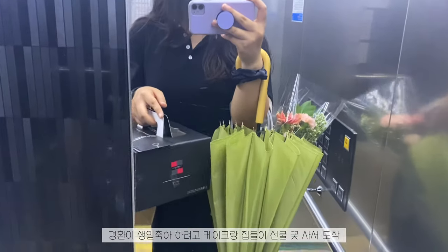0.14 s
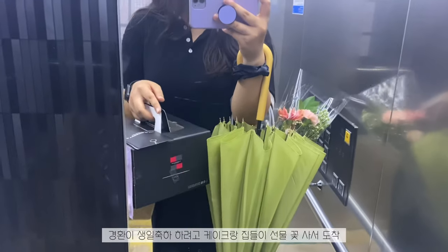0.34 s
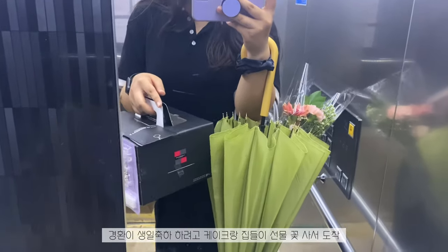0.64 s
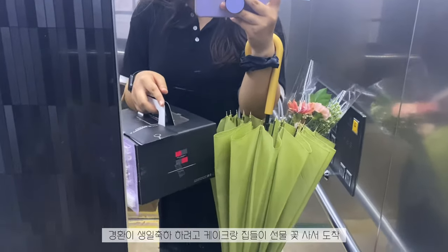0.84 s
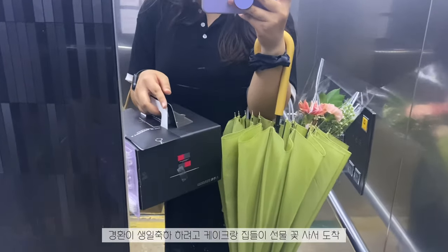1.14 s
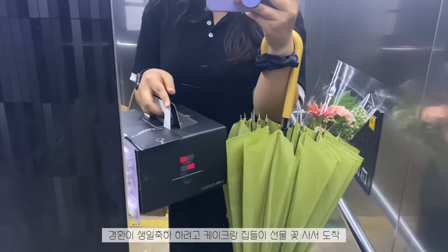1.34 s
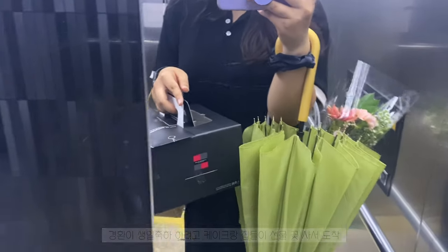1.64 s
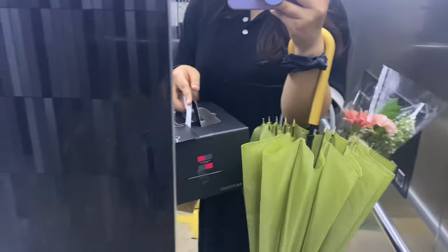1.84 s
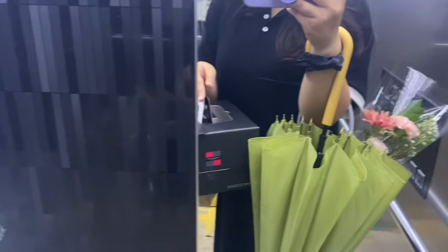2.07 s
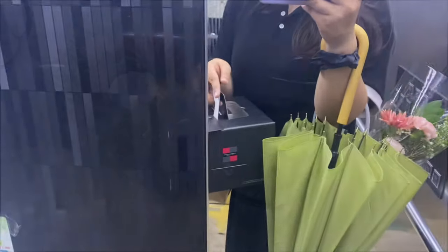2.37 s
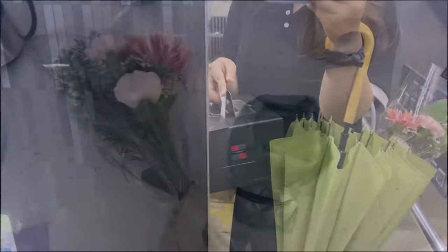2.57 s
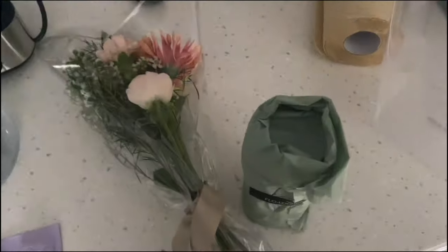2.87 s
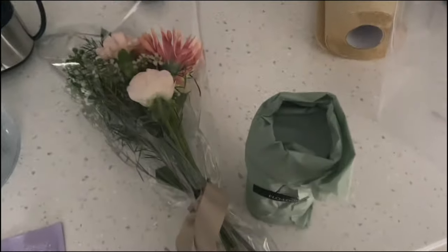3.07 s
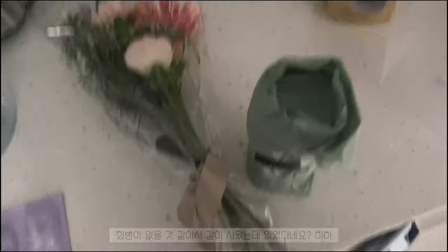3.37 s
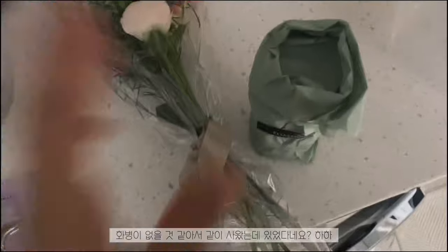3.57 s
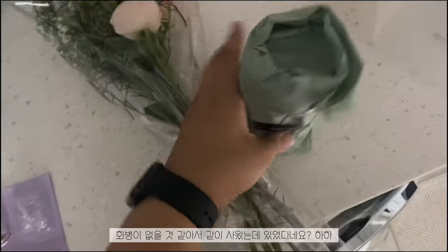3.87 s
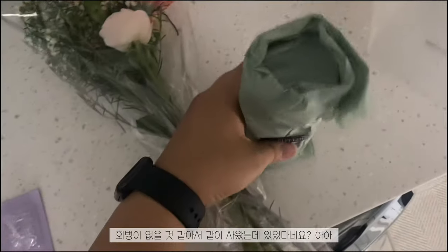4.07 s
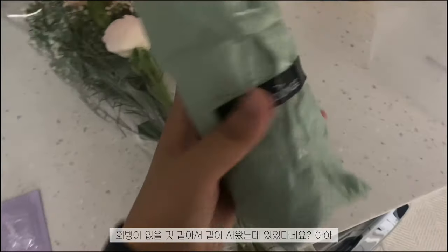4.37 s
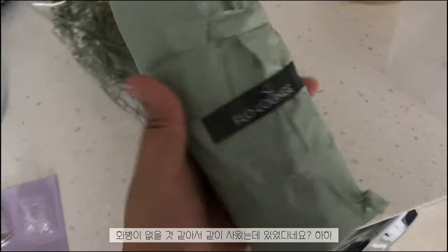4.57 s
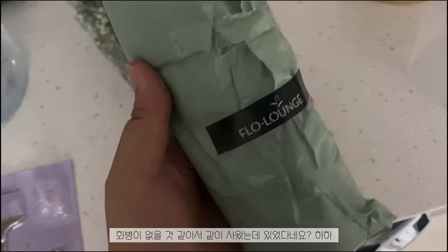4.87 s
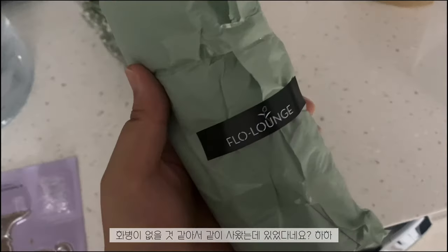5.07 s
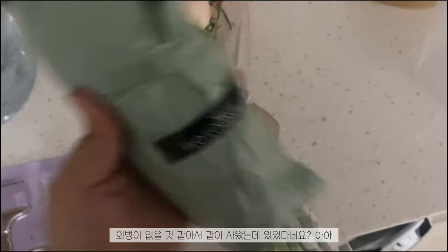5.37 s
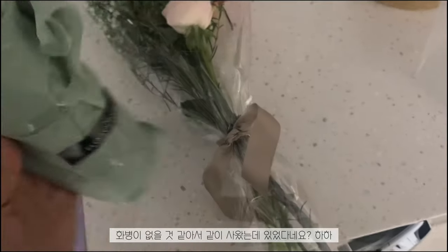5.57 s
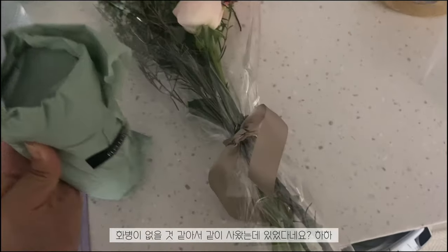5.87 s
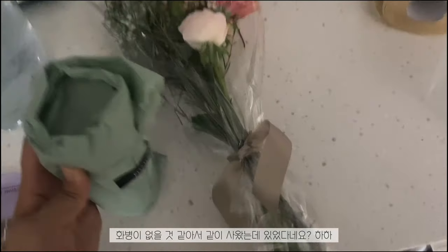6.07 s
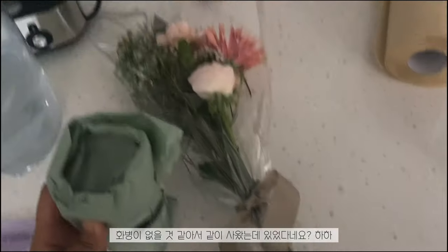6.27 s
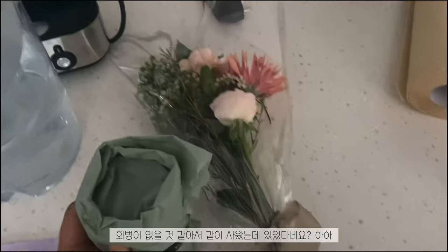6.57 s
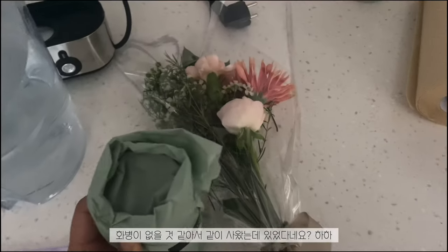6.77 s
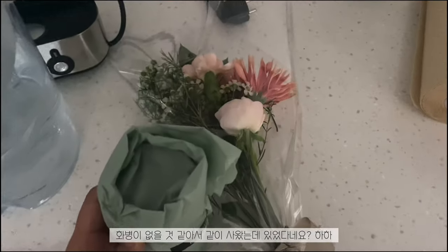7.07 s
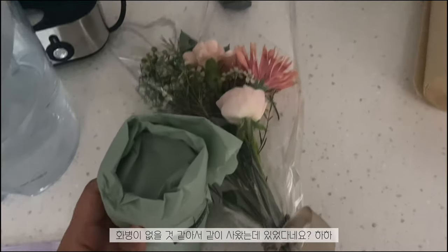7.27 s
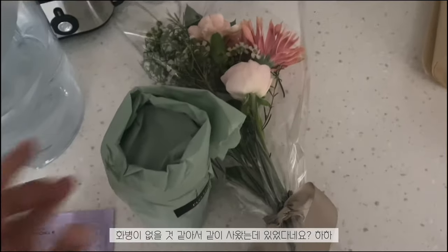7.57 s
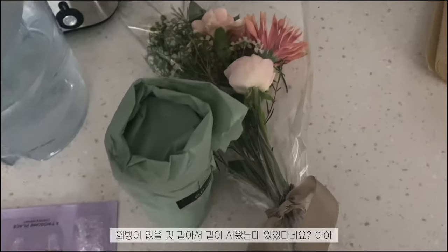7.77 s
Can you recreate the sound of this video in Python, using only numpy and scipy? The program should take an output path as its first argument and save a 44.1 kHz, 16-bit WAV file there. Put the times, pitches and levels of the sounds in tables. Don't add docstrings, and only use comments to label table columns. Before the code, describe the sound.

Deep jolting elevator rumble and fan hiss cut suddenly to near silence, with close paper crinkling, sharp crease snaps and dull glass knocks.

```python
import sys
import numpy as np
from scipy import signal
from scipy.fft import rfft, irfft, next_fast_len
from scipy.io import wavfile
from scipy.ndimage import uniform_filter1d

SR = 44100
rng = np.random.default_rng(int(sys.argv[2]) if len(sys.argv) > 2 else 0)


def int16_out(signal):
    q = np.round(np.clip(np.atleast_2d(signal).T, -1, 1) * 32767)
    wavfile.write(sys.argv[1], SR, q.astype(np.int16))


def nominal_scale(level):
    x = np.asarray(level, float) / 20
    return 10 ** x


N = 348831
T = np.arange(N) / SR
SIZE = next_fast_len(N)
HZ = np.maximum(np.arange(SIZE // 2 + 1) * SR / SIZE, 1.)


def unit(x):
    return x / np.sqrt(np.mean(x ** 2))


def over_hz(table):
    hz, value = np.transpose(table)
    return np.interp(np.log(HZ), np.log(hz), value)


def colour(x, table):
    below = [(table[0][0] / 2, table[0][1] - 40)]
    above = [(table[-1][0] * 1.03, table[-1][1] - 30)]
    gain = nominal_scale(over_hz(below + list(table) + above))
    return irfft(rfft(x, SIZE) * gain, SIZE)[..., :N]


def ring(x, hz, width):
    return signal.lfilter(*signal.iirpeak(hz, hz / width, SR), x)


def walk(rate):
    steps = rng.standard_normal(int(N / SR * rate) + 3)
    joined = np.interp(T * rate, np.arange(len(steps)), steps)
    return uniform_filter1d(joined, int(SR / rate / 2))


def noise():
    return rng.standard_normal((2, N))


def swells(s, hold_s, db, rise_db_s, fall_db_s):
    t = T[::64, None]
    rise = rise_db_s * np.maximum(s - t, 0)
    fall = fall_db_s * np.maximum(t - s - hold_s, 0)
    power = np.sum(nominal_scale(2 * (db - rise - fall)), axis=1)
    return np.interp(T, t[:, 0], np.sqrt(power))


def snaps(events, crack_s, tail_s, tail_db, ring_db, step):
    length = 4096
    out, t = np.zeros((2, N + length)), np.arange(length) / SR
    bursts = rng.standard_normal((len(events), 2, length))
    bursts[:, 0, 0] = step * np.sign(bursts[:, 0, 0])
    rise = 1 - 0.63 * np.exp(-t / .0003)
    shape = rise * np.exp(-t / crack_s) + nominal_scale(tail_db) * np.exp(-t / tail_s)
    treble = signal.butter(3, [1100, 13000], "bandpass", fs=SR)
    for (s, db, hz, *body_db), burst in zip(events, bursts * shape):
        snap = signal.lfilter(*treble, burst)
        snap = snap + nominal_scale(ring_db) * ring(burst, hz, 350 + .1 * hz)
        snap = snap / np.abs(snap[0]).max()
        for low_db in body_db:
            low = ring(ring(burst, 780, 600), 780, 700)
            snap = snap + nominal_scale(low_db) * low / np.abs(low[0]).max()
        start = int(s * SR)
        out[:, start:start + length] += nominal_scale(db) * snap
    return out[:, :N]


def ports(pair, like, from_hz, turn_hz, dwell):
    a, b = rfft(pair, SIZE)
    share = np.clip(over_hz(like), 0, 1)
    same = np.sqrt((1 + share) / 2) * a
    other = np.sqrt((1 - share) / 2) * b
    angle = 2 * np.pi * np.maximum(HZ - from_hz, 0) / turn_hz
    turn = np.exp(.5j * (angle - dwell * np.sin(2 * angle)))
    return irfft(np.array([(same + other) * turn, (same - other) / turn]), SIZE)[:, :N]


def shaft_rumble(load_db):
    # frequency in Hz, level in dB per Hz.
    cabin = [(25, -12), (50, -7.5), (100, -5.5), (180, -13.5), (330, -18), (560, -16.5), (1000, -26),
             (1500, -39)]
    # start in seconds, hold in seconds, level in dB.
    jolts = [(0.0, .02, 7.5), (.195, .03, 7), (0.337, .03, 5), (0.47, .03, 3), (.592, .03, 2),
             (0.734, .02, 9), (0.798, .02, -1), (0.89, .03, 4.5), (1.006, .02, 4), (1.098, .04, 3.5),
             (1.264, .03, 4), (1.388, .04, 7.5), (1.574, .04, 2), (1.747, .04, 6.5), (1.924, .02, 6),
             (1.996, .03, 6), (2.165, .03, 1.5), (2.33, .02, 2), (2.433, .03, 2.5), (2.563, .03, 4.5),
             (2.705, .04, -6), (2.822, .03, 1.5)]
    # frequency in Hz, width in Hz, level in dB.
    panels = [(80.5, 22, -6.5), (107, 14, -13.5), (147, 21.5, -7), (176.2, 10.5, -10), (228.3, 10, -14),
              (253.5, 16, -10.5), (387, 19, -12), (500, 15, -14), (597, 17, -27.5), (828.7, 13, -21),
              (977, 86, -17.5), (1168, 35, -30), (1425, 42, -29.5)]
    rumble = unit(colour(noise(), cabin)) * nominal_scale(-42 + load_db + walk(9.03))
    jolt = swells(*np.transpose(jolts), rise_db_s=203, fall_db_s=151)
    floor_hz = 102 + 5 * walk(9)
    note = np.sin(2 * np.pi * np.cumsum(floor_hz) / SR)
    rumble[0] += note * (jolt + nominal_scale(-11)) * nominal_scale(-41.5)
    boom_db = -39 + 1.8 * load_db
    wall_db = -38 + 0.33 * load_db
    for hz, width, db in panels:
        shake_db = boom_db if hz < 150 else wall_db
        rumble = rumble + nominal_scale(db + shake_db + walk(3.46)) * unit(ring(noise(), hz, width))
    return rumble


def cabin_fan(load_db):
    # frequency in Hz, level in dB per Hz.
    air = [(900, 0.5), (1500, 8), (2700, 4.5), (3500, -2.5), (6000, -5), (8500, -3.5), (12000, -10),
           (14500, -7.5), (15600, -15.5)]
    # frequency in Hz, width in Hz, level in dB.
    whines = [(2135, 40, -8), (2704, 12, -9), (15004, 8, -13)]
    hiss = unit(colour(noise(), air)) * nominal_scale(6.0 + 1.7 * walk(15))
    for hz, width, db in whines:
        whine = unit(ring(ring(noise(), hz, width), hz, 3 * width))
        hiss = hiss + nominal_scale(db + walk(11.0)) * whine
    return hiss * nominal_scale(-62.5 + 0.57 * load_db)


def bouquet_wrap():
    # start in seconds, hold in seconds, rustle in dB.
    shifts = [
        (0.046, 0.015, -58.5),
        (0.242, 0.017, -58),
        (0.578, 0.019, -59),
        (1.04, 0.099, -58),
        (1.177, 0.018, -56),
        (1.245, 0.029, -53.5),
        (1.374, 0.096, -57.5),
        (1.542, 0.019, -57),
        (1.662, 0.14, -68),
        (2.768, 0.086, -61),
    ]
    # frequency in Hz, level in dB per Hz.
    film = [(1200, -4), (2500, 1), (4500, -1), (7000, -6), (12000, -11), (15600, -12.5)]
    # time in seconds, peak in dB, pitch in Hz.
    wrap_creases = [
        (0.0458, -38, 1610),
        (0.2274, -38.5, 3500),
        (0.5736, -43, 3500),
        (1.1089, -38, 2250),
        (1.1766, -40, 2250),
        (1.2466, -36.5, 2560),
        (1.2475, -34.5, 5530),
        (1.428, -37, 4500),
        (1.5424, -39, 2710),
    ]
    rustle = swells(*np.transpose(shifts), rise_db_s=903, fall_db_s=130)
    rub = unit(colour(noise(), film)) * rustle * nominal_scale(2.5 + 2.0 * walk(44.3))
    cracks = snaps(wrap_creases, crack_s=0.0074, tail_s=0.027, tail_db=-19, ring_db=17, step=1.2)
    return rub + cracks * nominal_scale(-6.5)


def lift():
    # time in seconds, level in dB.
    ride = [(0.0, 1), (0.6, 0.5), (1.2, 1.5), (1.75, 1), (2.15, -1), (2.55, 0.5), (2.85, -0.5)]
    # frequency in Hz, likeness from 0 to 1.
    lift_like = [(25, 0.98), (60, 0.98), (130, 0.96), (290, 0.67), (640, 0.1), (1500, 0.03), (3000, 0.42),
                 (5500, 0.35),
                 (6600, .8), (8000, .93), (16000, .93)]
    load_db = np.interp(T, *np.transpose(ride))
    car = shaft_rumble(load_db) + cabin_fan(load_db) + bouquet_wrap()
    return ports(car, lift_like, from_hz=7000, turn_hz=-4080, dwell=.25)


def kitchen_room():
    # time in seconds, gain in dB.
    phone_gain = [(2.86, -9.5), (3.0, -4.5), (3.43, -3), (3.47, -5.5), (3.55, -3.5), (3.7, -4.5),
                  (3.82, 2.5), (7.91, 1)]
    # frequency in Hz, level in dB per Hz.
    room_colour = [(30, -21.5), (45, -8), (63, 0), (85, -11), (110, -14), (140, -21), (230, -18),
                   (330, -22.5), (470, -25), (640, -38), (2000, -53), (9000, -55), (15000, -64)]
    # frequency in Hz, width in Hz, level in dB.
    modes = [(193.7, 30, -16), (448, 40, -19.5), (75, 18, -7)]
    hum = nominal_scale(-69.5 + 1.5 * walk(20.0)) * np.sin(2 * np.pi * 120 * T)
    hum = hum * np.array([[np.sqrt(2)], [0]])
    tone = unit(colour(noise(), room_colour))
    for hz, width, db in modes:
        tone = tone + nominal_scale(db + 1.5 * walk(2.4)) * unit(ring(ring(noise(), hz, width), hz, width))
    room = tone * nominal_scale(-64.5 + walk(3.6)) + hum
    mic_hiss = colour(noise(), [(1000, 9), (2200, 8.5), (3200, -2.5), (11000, -11.0), (15000, -11)])
    room = room + nominal_scale(-93.0) * unit(mic_hiss)
    return room * nominal_scale(np.interp(T, *np.transpose(phone_gain)))


def vase():
    # time in seconds, peak in dB, pitch in Hz.
    rocks = [(6.1679, -43, 387), (6.2097, -46.5, 450), (6.2332, -46.5, 445), (6.251, -51, 446),
             (6.2753, -51, 433), (6.36, -59, 463), (6.451, -62, 446), (6.576, -54.5, 445),
             (6.603, -62, 433), (6.633, -64, 450), (6.683, -62, 430)]
    # time in seconds, peak in dB, pitch in Hz, fade in seconds.
    thumps = [(3.416, -61, 593, 0.0054), (3.428, -52.5, 670, 0.0051), (3.428, -55.5, 500, 0.004),
              (3.796, -43, 246, .021), (3.798, -34, 540, .0058), (3.80, -41, 910, .006),
              (3.804, -60, 383, .010), (4.2013, -38, 1700, .001), (4.2013, -46, 910, 0.0026),
              (4.2013, -52, 560, .008), (4.205, -58.5, 280, .015), (6.168, -48, 560, 0.0047),
              (6.17, -55, 303, 0.0089), (6.2105, -58, 600, .003), (6.235, -53, 330, .006)]
    length = 4096
    out, t = np.zeros(N + length), np.arange(length) / SR
    for s, db, hz in rocks:
        knock = np.sin(2 * np.pi * hz * t) * np.exp(-t / 0.0063) * (1 - np.exp(-(t / 0.0021) ** 2))
        for mode_hz, mode_db in ((1300, -24), (1620, -18.5)):
            mode = np.sin(2 * np.pi * mode_hz * t) * np.exp(-t / 0.0043) * np.minimum(t / 0.0015, 1)
            knock = knock + nominal_scale(mode_db + 2.0 * (db + 46.5)) * mode
        start = int(s * SR)
        out[start:start + length] += nominal_scale(db + 8.5) * knock
    for s, db, hz, fade_s in thumps:
        start = int(s * SR)
        out[start:start + length] += nominal_scale(db) * np.sin(2 * np.pi * hz * t) * np.exp(-t / fade_s)
    return np.array([out[:N], 0.84 * np.roll(out[:N], 12)])


def paper_rustle():
    # start in seconds, hold in seconds, rustle in dB, body under 1.2 kHz in dB.
    moves = [(3.757, .045, -49.5, -18), (3.796, 0.0049, -38.5, -6), (3.827, 0.052, -53, -7.5),
             (3.873, 0.016, -59, -3), (3.975, 0.2, -58.5, -10.5), (4.212, .008, -56.5, -3),
             (4.259, 0.043, -57, -10), (4.32, 0.18, -55, -10.5), (4.502, 0.18, -55.5, -9),
             (4.756, 0.097, -60.5, -11.5), (4.86, 0.047, -69, -23), (4.983, 0.01, -59, -14),
             (5.042, 0.077, -66.5, -16), (5.14, .006, -64, -8), (5.197, 0.061, -63, -11),
             (5.291, 0.025, -54, -15.5), (5.385, .11, -58.5, -11.5), (5.49, 0.12, -63, -14),
             (5.65, 0.075, -66, -19), (5.758, .09, -72.5, -13), (5.913, 0.0046, -65, -14),
             (5.98, 0.086, -67, -15), (6.062, 0.026, -61, -12.5), (6.154, 0.089, -62.5, -9),
             (6.298, 0.058, -60.5, -17), (6.42, 0.18, -66, -17), (6.6, 0.079, -68.5, -22),
             (6.715, 0.2, -71, -20), (6.965, 0.14, -74, -8), (7.188, 0.069, -64, -13),
             (7.302, 0.051, -67, -8), (7.468, 0.07, -89.5, 8), (7.911, .02, -75, -24)]
    # frequency in Hz, level in dB per Hz.
    sheet_colour = [(1000, -13), (1600, -1), (2300, 5), (3300, 0), (4200, -3), (5100, -2.5), (6500, 1),
                    (9000, -4.5), (13000, -9), (15600, -6)]
    s, hold_s, rustle_db, body_db = np.transpose(moves)
    slip_now = rng.random(N) < 700 / SR * nominal_scale(3.5 * walk(14))
    slips = slip_now * nominal_scale(np.minimum(2.9 * rng.exponential(size=N), 11))
    grain = signal.lfilter([1], [1, -np.exp(-1 / (.001 * SR))], slips)
    rub = unit(noise() * (unit(grain) + 1.1)) * nominal_scale(1.2 * walk(40) - 0.5)
    body = unit(colour(rub, [(300, -8.5), (420, -2.0), (560, 0.0), (900, -6.5), (1350, -7.5)]))
    edge_db = np.where(T < 5.6, -14, -7.5)
    sheet = unit(colour(rub, sheet_colour)) + nominal_scale(edge_db) * unit(ring(rub, 4850, 1000))
    rise_db_s, fall_db_s = 600, 213
    sheet = sheet * swells(s, hold_s, rustle_db, rise_db_s, fall_db_s)
    return sheet + body * swells(s, hold_s, rustle_db + body_db, rise_db_s, fall_db_s)


def paper_creases():
    # time in seconds, peak in dB, pitch in Hz.
    grab = [(3.7295, -49, 4660), (3.7505, -43, 5100), (3.7776, -22.5, 5240), (3.7946, -24.5, 2170),
            (3.7962, -22.5, 2000), (3.801, -25, 2400)]
    turning = [(3.9675, -35, 2160), (3.9865, -44, 2600), (4.0074, -44, 2150), (4.0772, -38, 2316),
               (4.1107, -42, 2400), (4.2006, -23, 1367), (4.3865, -40, 5070), (4.415, -41, 2350),
               (4.4968, -39.5, 2230), (4.5272, -37.5, 4940), (4.5741, -31.5, 2240), (4.6125, -43.5, 2050),
               (4.644, -35, 2320), (4.6749, -41, 2370), (4.7028, -37.5, 2130), (4.7362, -46.5, 4970),
               (4.7607, -42, 8800), (4.7836, -43, 4970), (4.8041, -39.5, 2560), (4.8445, -39, 2050),
               (4.9153, -49, 2355), (4.9533, -48.5, 1860), (4.9757, -45, 2030), (5.0006, -38, 4900),
               (5.0236, -44, 4980), (5.046, -49, 5190), (5.059, -48, 2400), (5.067, -45, 4850),
               (5.1418, -40, 12000)]
    put_down = [(5.1862, -47, 2350), (5.2047, -46, 4700), (5.2256, -45, 2290), (5.2705, -37.5, 2590),
                (5.294, -40.5, 2430), (5.4511, -43, 5030), (5.4741, -41.5, 2080), (5.5564, -42.5, 4250),
                (5.6217, -49, 5170), (5.71, -52, 4700), (5.7634, -49.5, 4590), (5.8447, -55, 2010),
                (5.9021, -51, 4540), (5.9151, -45.5, 4220), (5.9655, -48.5, 4850), (6.0123, -47.5, 5320),
                (6.0638, -38, 4800), (6.1959, -53, 4860), (6.2882, -50, 5270), (6.3356, -45.5, 4620),
                (6.4184, -57, 4720), (6.4972, -65, 2200), (6.5342, -47.5, 2140), (6.6055, -52, 4750),
                (6.6733, -53, 4500)]
    settling = [(6.8506, -56, 4740), (6.9456, -76, 3790), (7.0383, -51.5, 4500), (7.06, -73, 5310),
                (7.0942, -52, 3050), (7.103, -57, 5470), (7.1312, -56, 2350), (7.162, -59, 5430),
                (7.1926, -54, 2495), (7.202, -54, 3580), (7.2315, -45, 5700), (7.3266, -46, 4900),
                (7.3842, -56.5, 4640), (7.428, -59, 4870), (7.5216, -60.5, 3240), (7.5377, -61, 4950),
                (7.636, -56, 5840), (7.7268, -72, 3760), (7.892, -54, 5050)]
    small_creases = [
        (3.4144, -64, 2400),
        (3.4254, -54, 1980),
        (4.221, -40, 1810),
        (5.133, -48.5, 11100),
        (6.0804, -43.5, 5170),
                     (3.9498, -46, 5200), (3.961, -42, 5000), (4.049, -54, 2200), (4.2682, -47, 1790),
                (4.335, -45, 2300), (4.536, -48, 2400), (4.555, -49, 2300), (4.811, -44, 9500),
                (4.9869, -42, 2000), (5.2513, -51, 2200), (5.287, -46, 4970), (5.391, -50, 5100),
                (5.5251, -45.5, 4850), (5.578, -44.5, 4900), (5.7526, -64, 4800), (5.816, -58.5, 8900),
                (5.862, -55.5, 4890), (5.959, -56, 4500), (5.995, -55, 5280), (6.068, -53, 2300),
                (6.298, -53, 2170), (6.4694, -64, 2000), (6.5074, -49.5, 2270), (6.969, -60, 2920),
                (6.981, -57.5, 5130), (4.2028, -29.5, 5500)]
    creases = settling + small_creases
    for rows, body_db in ((grab, -9.5), (turning, -21), (put_down, -24)):
        creases = creases + [(*row, body_db) for row in rows]
    return nominal_scale(1.5) * snaps(creases, crack_s=.001, tail_s=0.01, tail_db=-15.5, ring_db=10, step=4.5)


def kitchen():
    # frequency in Hz, likeness from 0 to 1.
    kitchen_like = [(60, 1), (130, 0.99), (290, 0.86), (640, 0), (1500, 0.7), (3100, 0), (5000, 0.6),
                    (6500, .9), (16000, .88)]
    pair = kitchen_room() + vase() + paper_rustle() + paper_creases()
    return ports(pair, kitchen_like, from_hz=4300, turn_hz=6080, dwell=.24)


def scene():
    cut = np.clip((T - 2.858) / 0.001, 0, 1)
    return lift() * (1 - cut) + kitchen() * cut


def low_pass(x):
    return signal.sosfilt(signal.butter(12, 17010, fs=SR, output="sos"), x)


def record(dry):
    return low_pass(dry)


dry = scene()
out = record(dry)
int16_out(out)
```